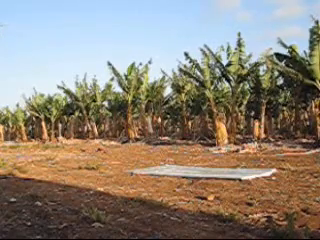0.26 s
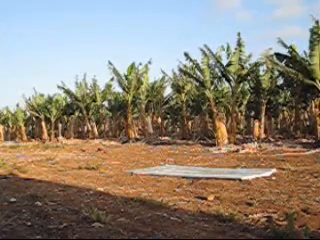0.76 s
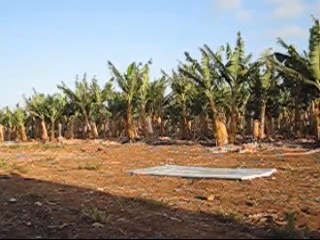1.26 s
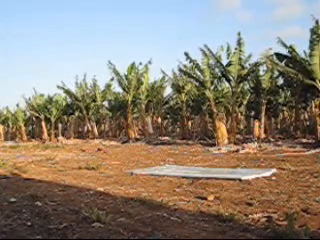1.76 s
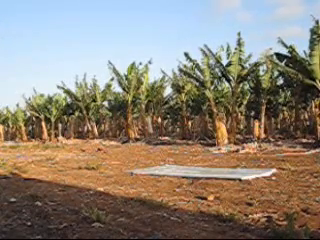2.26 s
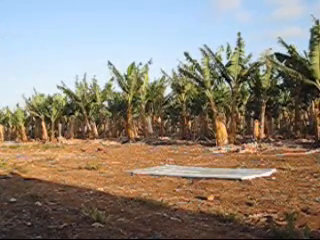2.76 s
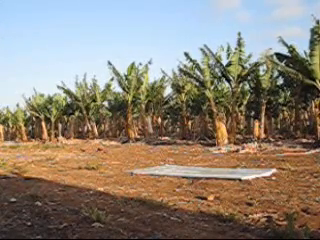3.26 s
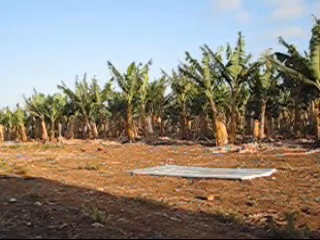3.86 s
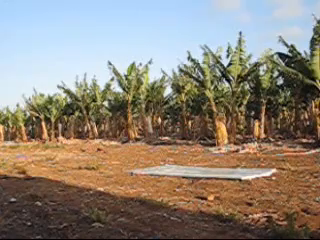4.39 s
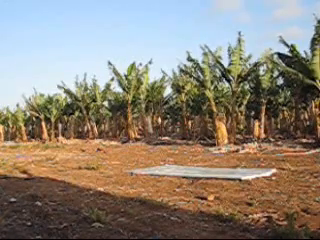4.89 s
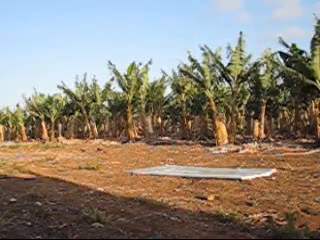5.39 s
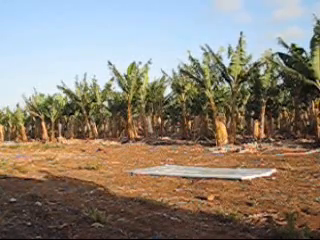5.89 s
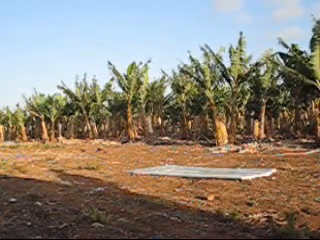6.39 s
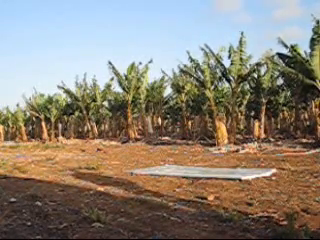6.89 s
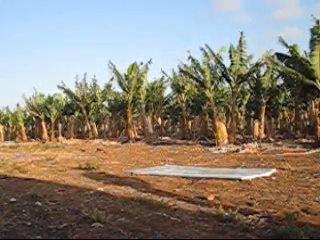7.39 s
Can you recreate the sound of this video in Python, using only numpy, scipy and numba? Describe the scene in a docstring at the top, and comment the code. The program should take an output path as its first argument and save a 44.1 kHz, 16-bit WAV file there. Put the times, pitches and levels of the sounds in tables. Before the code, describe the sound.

An electric model helicopter flies close by outdoors, its high gear whine wavering over the rush and slap of its blades.

```python
"""In an open field edged by trees, an electric model helicopter flies close by.
Its gear teeth whine, its two main blades rush, slap and thud, and its tail rotor hums,
buzzing as it bites the air in a turn. The motor sings, its speed controller whistles, and
the trees throw the whine back at a shifted pitch. Soft wind blows and a few dry ticks snap nearby."""
import sys
import numpy as np
from scipy import signal
from scipy.io import wavfile
from scipy.ndimage import uniform_filter1d
from numba import njit

SR = 44100
rng = np.random.default_rng(int(sys.argv[2]) if len(sys.argv) > 2 else 0)


def unload_audio(sound):
    """Save the sound as a 16-bit wav file, at the path given as the first command line argument."""
    columns = np.transpose(np.atleast_2d(sound))
    # keep every value between -1 and 1, then stretch to whole-number steps
    steps = np.round(np.clip(columns, -1, 1) * 32767)
    wavfile.write(sys.argv[1], SR, steps.astype(np.int16))


N = 336924


def amp(db):
    """Turns decibels into a number to multiply by."""
    return 10 ** (np.asarray(db) / 20)


def unit_level(x):
    """Scales a sound to an average (rms) level of 1."""
    return x / np.sqrt(np.mean(np.abs(x) ** 2) + 1e-20)


def curves(rows):
    """Joins a table's timed rows with straight lines, one curve per column."""
    times, *columns = np.transpose(rows)
    return [np.interp(np.arange(N) / SR, times, column) for column in columns]


@njit
def smoothed(x, keep):
    """Smooths by keeping a share of the previous output."""
    out = np.zeros_like(x)
    for k in range(1, len(x)):
        out[k] = keep[k] * out[k - 1] + (1 - keep[k]) * x[k]
    return out


def narrow_band(x, hz, width_hz):
    """Keeps the sound near hz. Twice over: shift it down to zero, smooth it, shift it back."""
    turn = np.exp(2j * np.pi * np.cumsum(hz) / SR)
    keep = np.exp(-np.pi * width_hz * np.ones(N) / SR)
    for _ in range(2):
        x = 2 * (turn * smoothed(x / turn, keep)).real
    return x


def noise(colour, patchy_db, scale=np.ones(N), steep=np.ones(N)):
    """Noise with drifting patches; colour lists (pitch, level_db), scale slides it, steep narrows it."""
    frames, hz = N // 256 + 5, np.fft.rfftfreq(1024, 1 / SR)
    real, imag, patches = rng.standard_normal((frames, 513, 3)).T
    patches = unit_level(uniform_filter1d(uniform_filter1d(patches, 12, 0), 14, 1))
    at = np.clip(np.arange(frames) * 256, 0, N - 1)
    pitch, db = np.transpose(colour)
    log_pitch = np.log((hz[:, None] + 1) / scale[at])
    shape = amp(steep[at] * np.interp(log_pitch, np.log(pitch), db, -120, -120))
    spectrum = (real + 1j * imag) * shape / np.linalg.norm(shape, axis=0) * amp(patchy_db * patches)
    return unit_level(signal.istft(spectrum, nperseg=1024, noverlap=768)[1][:N])


def tones(angle, rows, waver, per_s):
    """Pure tones at multiples of a turning angle, each wavering in level and timing on its own."""
    step, at, out = np.arange(N // 128 + 2), np.arange(N) / 128, np.zeros(N)
    window = np.hanning(int(SR / 128 / max(per_s, 1)) + 3)
    for multiple, db in rows:
        drift = rng.standard_normal((len(step), 2)) @ [1, 1j]
        drift = unit_level(np.convolve(drift, window, "same"))
        drift = (1 + waver * drift) / np.sqrt(1 + waver ** 2)
        slip = np.interp(at, step, np.unwrap(np.angle(drift)) + 2 * np.pi * rng.random())
        out += np.interp(at, step, amp(db) * abs(drift)) * np.cos(multiple * angle + slip)
    return np.sqrt(2) * out


TEETH = 170  # on the main gear
# The gear's whine, higher as it comes closer and lower as it leaves: time_s, pitch_hz
WHINE_PITCH = [(0, 5322), (.3, 5332), (.58, 5339), (.77, 5331), (.82, 5307), (.88, 5260), (.94, 5243),
               (1.2, 5238.5), (1.5, 5249), (1.9, 5286), (2.4, 5294), (3, 5301.5), (3.2, 5297), (3.6, 5307),
               (4.2, 5320.5), (4.65, 5337), (5.4, 5343), (5.7, 5340), (6, 5331), (6.22, 5315.5),
               (6.75, 5309), (7.2, 5299.5), (7.64, 5301.5)]
def rotor_angle():
    """How far the main rotor has turned, in radians; each tooth makes one cycle of the whine."""
    return 2 * np.pi * np.cumsum(curves(WHINE_PITCH)[0]) / SR / TEETH


# The main whine, fading as the body turns: time_s, level_db
WHINE_LEVEL = [(0, -25.5), (.3, -17.5), (.4, -30), (.5, -22), (.62, -45), (.85, -27), (1.3, -28.5),
               (1.6, -19.5), (1.85, -20.5), (2.12, -23.5), (2.38, -36), (2.68, -24.5), (2.81, -33),
               (2.92, -23), (3.2, -26), (3.5, -34), (3.68, -25.5), (3.82, -35), (4.02, -26.5), (4.5, -30.5),
               (4.65, -19.5), (4.9, -23), (5.1, -25), (5.35, -31.5), (5.52, -26.5), (5.72, -35),
               (5.92, -22.5), (6.15, -20.5), (6.5, -17.5), (6.66, -20.5), (6.85, -16.5), (7.64, -17.5)]
# How strongly each group of tones points our way: time_s, below_db, above_db, four strong_db columns
GEAR_FACING = [(0, -45, -28, -36, -41, -30, -44), (.2, -43, -27, -39, -40, -32.5, -53),
               (.35, -30, -33, -40, -47, -37, -41), (.56, -27, -37, -40, -51, -38, -42),
               (.8, -44, -35.5, -55, -40, -48, -52), (1.05, -31.5, -35.5, -47, -47, -41, -58),
               (1.5, -36, -36.5, -42, -45, -42, -61), (2, -36, -34.5, -42, -33, -51, -53),
               (2.3, -41, -41.5, -63, -60, -45, -39.5), (2.75, -44, -40, -61, -54, -48, -47),
               (3.05, -41, -40, -64, -48, -44.5, -35), (3.7, -40, -38, -66, -53, -37.5, -62),
               (4.4, -41, -39, -63, -56, -44, -37.5), (4.62, -40, -32.5, -58, -37.5, -57, -46),
               (5.05, -51, -37.5, -54, -33, -52, -48), (5.5, -51, -35.5, -38, -40, -63, -65),
               (6.1, -41, -36, -59, -42.5, -42, -46), (6.4, -39, -29.5, -48, -38.5, -47, -47),
               (6.7, -43, -30.5, -43, -56, -45, -44), (7.05, -44, -29.5, -54, -40, -44, -50),
               (7.3, -42, -35, -58, -41, -46, -55), (7.64, -36, -33, -48, -36.5, -55, -58)]
# Side tones below, around, above and about an octave over the whine: cycles_per_turn, gain_db
TONES_BELOW = [(157, -12), (160, -9), (162, -12), (164, -7), (165, -9), (166, -11)]
TONES_AROUND = [(168, -1), (169, -7), (171, -6), (172, 0), (174, -3)]
TONES_ABOVE = [(176, -8), (178, -9), (179, -11), (180, -3), (181, -12), (182.14, -3), (183.1, -16),
               (184, -13), (186, -8), (188, -13), (190, -14), (192, -17), (194.3, -9), (198, -19),
               (200, -20), (202, -22), (204, -21)]
TONES_OCTAVE = [(324, -18), (332, -14), (333, -11), (334, -12), (335, -15), (336, -15), (341, -13),
                (344, -17), (345, -18), (346, -18), (347, -16), (348, -19), (360, -20), (364, -18),
                (376.3, -24)]
# Four groups near that octave, each led by one strong tone: cycles_per_turn, gain_db
STRONG_GROUPS = [
    [(316, 0), (303.8, -10), (309, -10)],
    [(328, 0), (321, -12), (322, -11)],
    [(340, 0)],
    [(352, 0)],
]
def gear_whine(angle):
    """Teeth whine as they meet and hiss as they slide; slightly off-centre wheels add side tones."""
    whine = amp(curves(WHINE_LEVEL)[0])
    below, above, *strong = amp(curves(GEAR_FACING))
    around = amp(-28) * np.sqrt(uniform_filter1d(whine, size=20000))
    octave = np.sqrt(sum(gain ** 2 for gain in strong))
    out = whine * tones(angle, [(TEETH, 0)], waver=.2, per_s=14)
    out += around * tones(angle, TONES_AROUND, waver=.78, per_s=6)
    out += below * tones(angle, TONES_BELOW, waver=.5, per_s=9)
    out += above * tones(angle, TONES_ABOVE, waver=.6, per_s=9)
    out += below * tones(angle, [(TEETH - 12, 0)], waver=.3, per_s=14)
    out += octave * tones(angle, TONES_OCTAVE, waver=.32, per_s=5.8)
    for gain, rows in zip(strong, STRONG_GROUPS):
        out += gain * tones(angle, rows, waver=.45, per_s=20)
    hiss = noise([(4700, -6), (5200, -4.5), (5700, -3), (6100, -9), (6700, -47)], patchy_db=4)
    top_hiss = noise([(9300, -20), (9900, -4), (10500, -2.5), (11100, -4), (11900, -18)], patchy_db=1.5)
    return out + above * amp(.5) * hiss + octave * amp(-1) * top_hiss


# The rush, swelling as the blades work harder: time_s, middle_db, slap_share (0 to 1)
RUSH_LEVEL = [(0, -32, 0), (.25, -29.5, 0), (.33, -26.5, 0.5), (.41, -20, 0.33), (.5, -23.5, 0.16),
              (.63, -27, 0.07), (.73, -34, 0.16), (.88, -29, 0.07), (1.2, -30.5, 0.17), (1.45, -32, 0),
              (2, -31.5, 0), (2.25, -33.5, 0), (2.8, -34, .01), (3.5, -33.5, 0.27), (3.98, -26, 0.3),
              (4.12, -27, 0.23), (4.35, -23.5, 0.5), (4.58, -21.5, .58), (4.9, -24, 0.64),
              (5.5, -22.5, 0.5), (5.72, -26.5, 0.48), (5.9, -31, 0.07), (6.1, -29.5, 0.33), (6.35, -32, .1),
              (6.6, -30.5, 0.3), (6.85, -26, .5), (7, -27, 0.42), (7.22, -30.5, 0.37), (7.47, -27, 0.62),
              (7.64, -26.5, .5)]
# Its tone as we see the rotor from different sides:
# time_s, middle_hz, low_hz, low_vs_middle_db, high_rest_db, high_steepness, ground_echo_ms
ROTOR_VIEW = [(0, 3670, 720, -14, -36, .4, 1.8), (.4, 3720, 880, -16.5, -35.5, 0.47, 2),
              (.72, 3060, 890, -5.5, -33.5, 0.61, 2.4), (1.05, 3150, 856, -8, -37.5, 0.98, 2.2),
              (1.5, 2660, 970, -8, -36, 0.91, 2.1), (2, 2670, 930, -5.5, -32, .7, 2),
              (2.5, 2680, 950, -6, -36, 0.78, 2), (3.2, 3100, 865, -5.5, -32.5, 1.1, 2.1),
              (4.1, 2950, 1270, -7.5, -38, 1.1, 1.8), (4.7, 3190, 1250, -5, -29.5, 1.8, 3.4),
              (5.2, 3050, 1100, -5, -33.5, 2, 2.4), (5.6, 2820, 900, -9, -31.5, 1.3, 1.7),
              (6.3, 2890, 766, -10.5, -33.5, 0.96, 2.1), (7, 2740, 700, -14.5, -31, 0.98, 2),
              (7.64, 2580, 696, -14.5, -33, 1.1, 1.7)]
# Colours of the low and middle rush: multiple_of_centre_pitch, level_db
LOW_COLOUR = [(.1, -23), (.25, -17), (.5, -4.5), (.8, 0), (1.1, 2.5), (1.6, 2), (2.6, -4)]
MIDDLE_COLOUR = [(.2, -27), (.5, -11), (.7, -3.5), (.9, 0.5), (1.1, 0), (1.3, -2), (1.5, -5.5), (1.8, -7.5),
                 (2.3, -11.5)]
# Colour of the high rush: pitch_hz, level_db
HIGH_COLOUR = [(3500, 0.5), (5200, -2.5), (6200, -1), (7500, -3.5), (9300, -6.5), (11000, -14.5),
               (12000, -14.5), (12700, -17)]
def blade_rush(angle):
    """Air rushes over two blades and bunches into a slap each time one sweeps toward us."""
    middle_db, slap_share = curves(RUSH_LEVEL)
    middle_hz, low_hz, low_db, high_rest_db, high_steepness, echo_ms = curves(ROTOR_VIEW)
    middle_steepness = .55 + 2 * slap_share  # more slap, narrower rush
    high_db = high_rest_db + .57 * (middle_db + 30)  # swells less than the middle; rests at its -30 dB
    phase_per_ms = 2 * np.gradient(angle) * SR / 1000
    phase = 2 * angle + phase_per_ms * .51 * echo_ms  # slaps run slightly ahead of the rotor
    slap = (phase / (2 * np.pi) + .5).astype(int)
    # Each slap gets its own size and comes a little early or late.
    size = amp(rng.uniform(-3, 3, slap.max() + 1))[slap]
    phase += phase_per_ms * .65 * rng.uniform(-1.1, 1, slap.max() + 1)[slap]

    def slaps(sharp, delay_ms, depth=1):
        """The level jumps with each slap and its bounce off the ground; one blade bites harder."""
        direct = np.exp(sharp * np.cos(phase - phase_per_ms * delay_ms))
        bounce = .45 * np.exp(sharp * np.cos(phase - phase_per_ms * (delay_ms + echo_ms)))
        burst = (direct + bounce) * (1 + .22 * np.cos(angle)) * size
        share = np.clip(depth * slap_share, 0, .95)
        return np.sqrt(1 - share + share * burst / burst.mean())

    low = amp(low_db) * noise(LOW_COLOUR, 1.8, low_hz) * slaps(sharp=.97, delay_ms=6.5) ** .54
    middle = noise(MIDDLE_COLOUR, 1.2, middle_hz, middle_steepness) * slaps(sharp=14, delay_ms=.5)
    high = noise(HIGH_COLOUR, 1.8, steep=high_steepness) * slaps(sharp=24, delay_ms=0, depth=1.03)
    return amp(middle_db) * (low + middle) + amp(high_db) * high


# Overtones of the passing blades, and the motor shaft's tone: cycles_per_turn, level_db
THUD_TONES = [(6, -66), (8, -69.5), (10, -65.5), (12.14, -56.5), (14, -59), (16, -57)]
# The swell added to those levels: time_s, gain_db
THUD_SWELL = [(0, -12), (.5, -4), (1, 0.5), (5, 0), (5.6, 8.5), (5.85, 3), (7.64, 2.5)]
def blade_thud(angle):
    """Low tones swell into a thudding as the helicopter passes."""
    return amp(curves(THUD_SWELL)[0]) * tones(angle, THUD_TONES, waver=.48, per_s=6.3)


# The tail rotor's hum: time_s, hum_db, overtones_db
TAIL_LEVEL = [(0, -59, -54), (.4, -62, -48.5), (.8, -45.5, -51), (1.4, -45.5, -48), (2, -48, -48),
              (2.6, -48, -51.5), (3.2, -49, -55.5), (3.9, -51, -54.5), (4.3, -48.5, -49), (5, -45.5, -49.5),
              (5.6, -54, -43), (6.1, -42.5, -50.5), (6.65, -40.5, -49), (6.85, -46.5, -49), (7.1, -41, -55),
              (7.64, -39, -54)]
def tail_hum(angle):
    """Two tail blades spin 4.5 times per main rotor turn, so they push the air 9 times."""
    hum, overtones = amp(curves(TAIL_LEVEL))
    out = hum * tones(angle, [(9, 0)], waver=.15, per_s=8)
    return out + overtones * tones(angle, [(18, 1.5), (27, -5.5), (36, -4.5)], waver=.47, per_s=6.5)


# Blade, motor and belt tones: cycles_per_turn, level_db
DRIVE_TONES = [(2, -58.5), (4, -59), (40.5, -52.5), (48.57, -52.5), (105.6, -54), (121.43, -44),
               (145.7, -46.5), (229, -56)]
def drive_drone(angle):
    """The motor, belt and blades sing in step with the rotor."""
    return tones(angle, DRIVE_TONES, waver=.51, per_s=15)


# The speed controller's tone: pitch_hz, level_db
CONTROLLER_TONE = [(7192, -49.5)]
def controller_whistle():
    """Power switching on and off very fast makes a thin whistle that ignores the rotor's speed."""
    return tones(2 * np.pi * np.arange(N) / SR, CONTROLLER_TONE, waver=.12, per_s=4.5)


# The whine coming back from the trees: time_s, pitch_hz, level_db
TREE_ECHO = [(0, 5345, -33), (.5, 5343, -29), (.85, 5290, -28.5), (2, 5315, -29.5), (2.6, 5312, -33),
             (3.7, 5290, -33), (5, 5310, -31), (5.5, 5305, -30.5), (6, 5285, -28), (7, 5262, -27.5),
             (7.64, 5250, -27)]
def tree_echo():
    """Many paths, each with its own pitch shift, blur the whine; a narrow band of noise plays it."""
    hz, db = curves(TREE_ECHO)
    return amp(db) * unit_level(narrow_band(rng.standard_normal(N), hz, width_hz=52))


# Colour of the wind: pitch_hz, level_db
WIND_COLOUR = [(25, -30), (40, -21), (60, 4), (120, -3.5), (250, -0.5), (450, 1), (800, 2), (1200, -37)]
# Its gusts: time_s, level_db
WIND_GUSTS = [(0, -52), (.6, -50), (2, -47), (4.3, -51), (6.3, -48.5), (7.2, -49), (7.64, -52)]
def wind():
    """Air moving over the field and past the listener rumbles softly."""
    return amp(curves(WIND_GUSTS)[0]) * noise(WIND_COLOUR, patchy_db=1.5)


# The buzz, dulling as its bright side swings away: time_s, level_db, brightest_hz, filter_width_hz
TURN_BUZZ = [(.15, -55, 4200, 2000), (.3, -27, 3700, 1000), (.42, -23.5, 3300, 1500), (.5, -34, 2800, 2400),
             (.6, -39, 1000, 1500), (.68, -42, 800, 1000), (.76, -50, 800, 1000), (.87, -32, 700, 800),
             (.95, -37, 1050, 700), (1.05, -34, 1120, 600), (1.12, -46, 1200, 1200), (1.5, -55, 1300, 1500)]
def tail_buzz(angle):
    """In a turn the tail blades bite the air and make sharp pulses."""
    db, hz, width_hz = curves(TURN_BUZZ)
    pulses = tones(angle, [(9 * k, 0) for k in range(2, 20)], waver=.4, per_s=12)
    buzz = narrow_band(pulses, hz, width_hz)
    buzz /= np.sqrt(uniform_filter1d(buzz ** 2, size=4000))  # evens out the level
    t = np.arange(N) / SR
    biting = (t > TURN_BUZZ[0][0]) & (t < TURN_BUZZ[-1][0])
    return biting * amp(db) * buzz


# Dry ticks close by: start_s, level_db, dull_vs_bright_db
DRY_TICKS = [(1.5803, -10, -9), (2.0411, -3.5, -8), (2.0479, -9, -10), (2.0491, -10, 1), (2.0892, -23, 6),
             (2.0939, -16, 3), (2.1506, -16, -4), (2.1882, -21, 10), (2.6295, -17, -2), (3.1269, -17, -2)]
def ticks():
    """Each short snap has a bright and a dull ring that die away at once."""
    out, t = np.zeros(N), np.arange(130) / SR
    for start_s, db, dull_db in DRY_TICKS:
        bright = np.sin(2 * np.pi * 7500 * t) * np.exp(-t / .00022)
        dull = amp(dull_db) * np.cos(2 * np.pi * 3000 * t) * np.exp(-t / .0004)
        at = round(start_s * SR)
        out[at:at + len(t)] += amp(db) * (bright + dull)
    return signal.lfilter(*signal.butter(2, 1200, "high", fs=SR), out)


def scene():
    """Adds everything into one channel; all spinning parts follow one rotor angle."""
    angle = rotor_angle()
    helicopter = gear_whine(angle) + blade_rush(angle) + blade_thud(angle) + tail_hum(angle)
    helicopter += drive_drone(angle) + controller_whistle() + tail_buzz(angle)
    return (helicopter + tree_echo() + wind() + ticks())[None]


def record(dry):
    """Rounds off the tallest peaks, then cuts the highest treble."""
    knee, headroom, cutoff_hz = .65, .27, 12620
    peaks = np.sign(dry) * (knee + headroom * np.tanh((abs(dry) - knee) / headroom))
    rounded = np.where(abs(dry) < knee, dry, peaks)
    low_pass = signal.firwin(511, cutoff_hz, window=("kaiser", 9), fs=SR)
    return signal.oaconvolve(rounded, low_pass[None], "same")


dry = scene()
out = record(dry)
unload_audio(out)
```